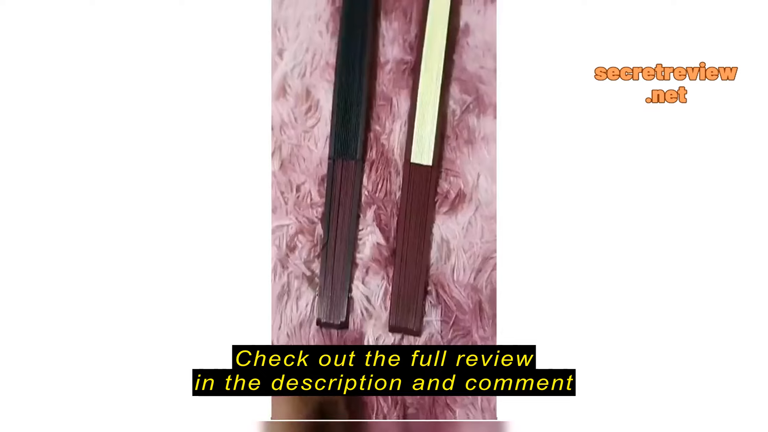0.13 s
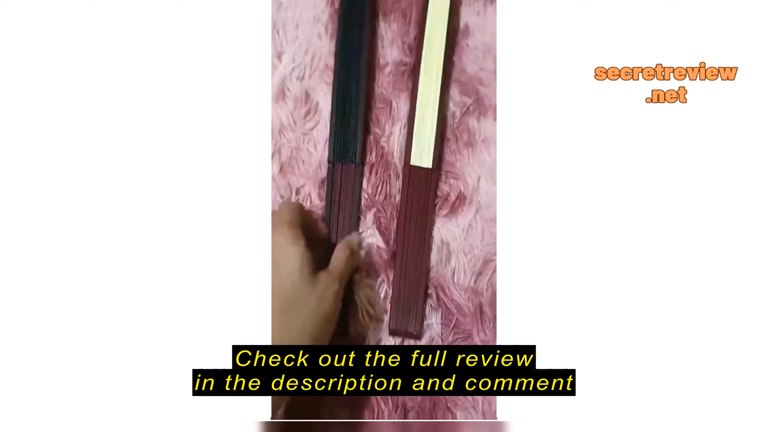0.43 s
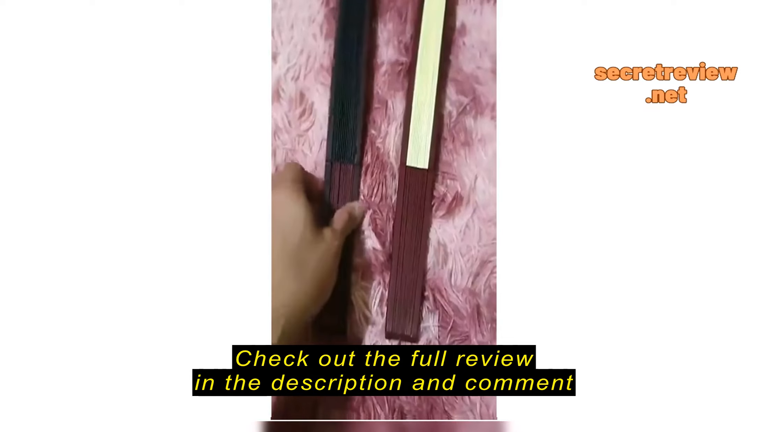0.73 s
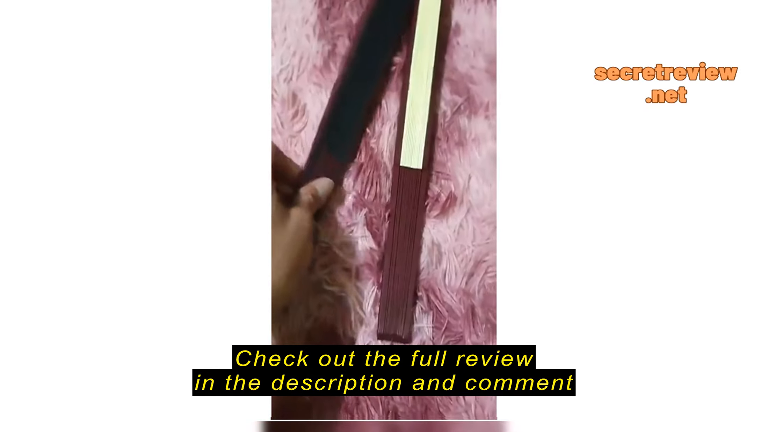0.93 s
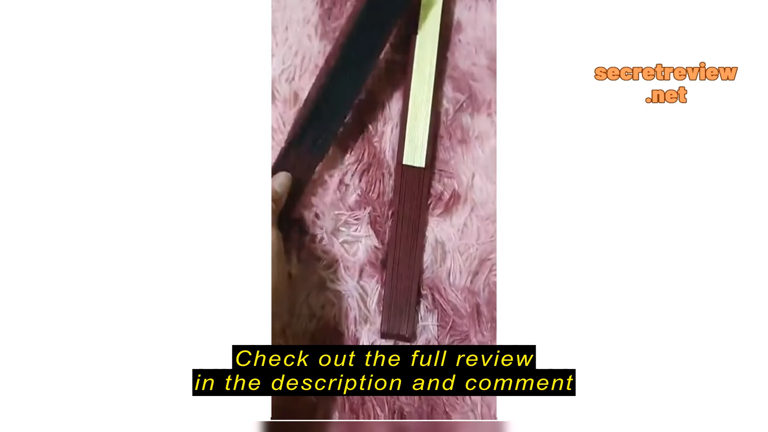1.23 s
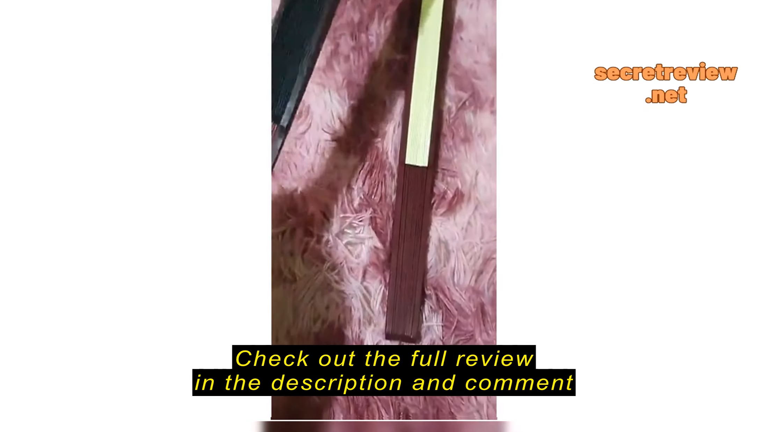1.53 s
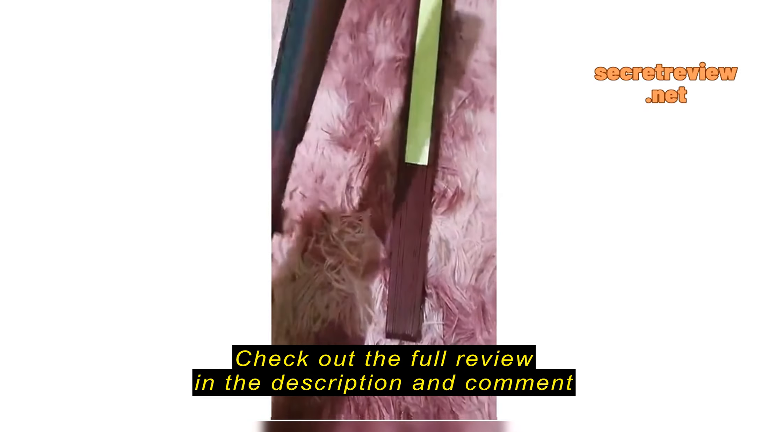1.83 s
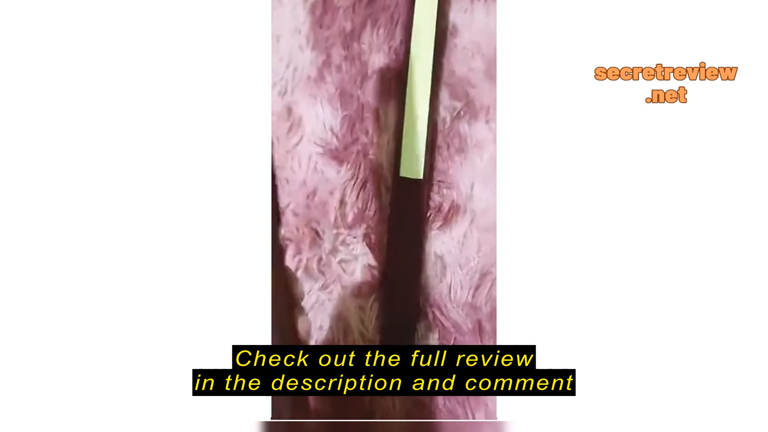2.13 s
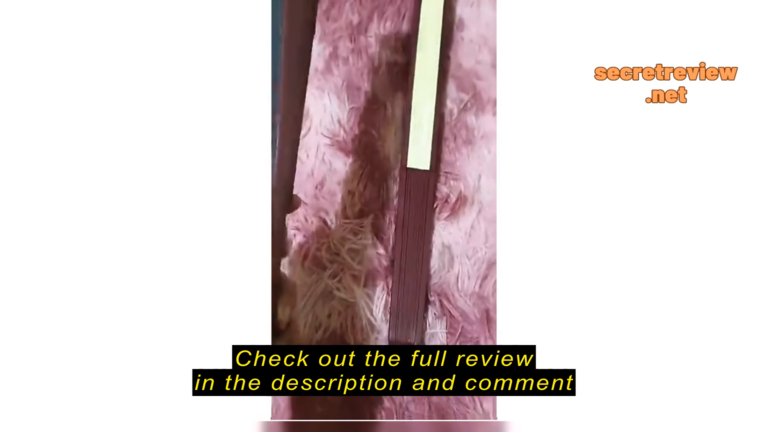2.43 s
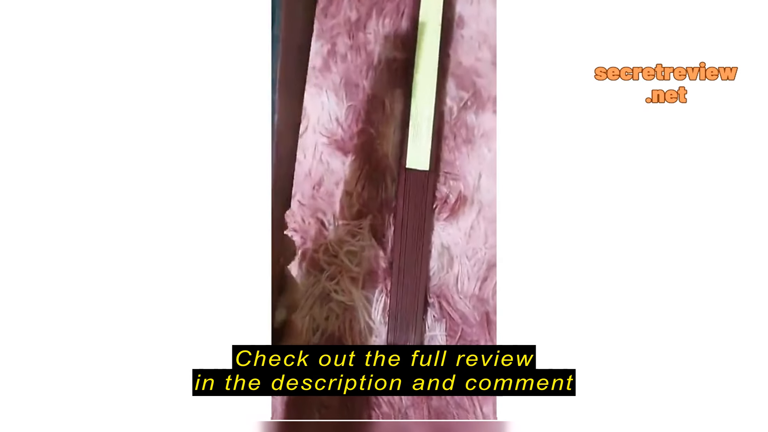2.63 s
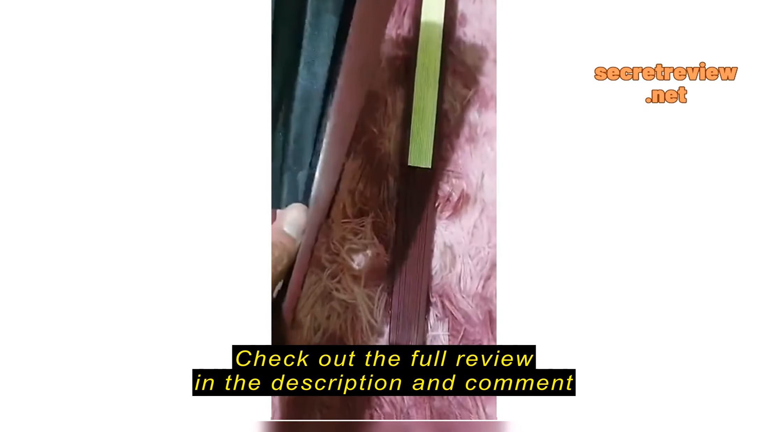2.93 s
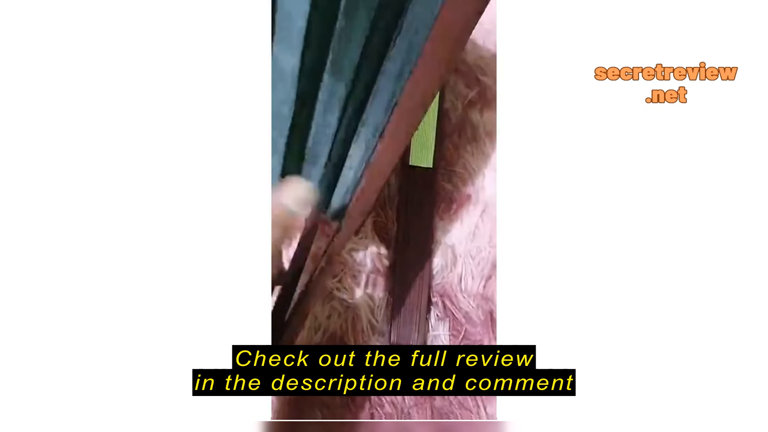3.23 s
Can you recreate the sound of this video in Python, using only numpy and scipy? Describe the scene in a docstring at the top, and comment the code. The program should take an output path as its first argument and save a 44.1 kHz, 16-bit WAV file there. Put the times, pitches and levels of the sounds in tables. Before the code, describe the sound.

A folding fan's ribs snap and its pleated cloth rustles, close up, over humming room air

```python
"""A motor, probably an electric room fan, hums and blows steadily over a low rumble and drone in a small room.
Close by, a hand lifts a closed folding fan from a furry rug: a faint squeak, then two rib clacks and a lighter tick.
The pleated cloth rustles as it slides apart, ribs rub and squeak faintly, and a last light tick comes near the end.
Hum is wavering sines, air and rumble are shaped noise, friction is sparse random slips in stroke envelopes,
and clacks are filtered pulses with decaying modes and noise."""
import sys
import numpy as np
from scipy import signal
from scipy.fft import rfft, irfft
from scipy.io import wavfile
from scipy.ndimage import uniform_filter1d

SR = 44100
rng = np.random.default_rng(int(sys.argv[2]) if len(sys.argv) > 2 else 0)


def to_wav(sig):
    """Store sig (one row per channel, or 1-D mono) as 16-bit WAV at the path in sys.argv[1].

    Samples outside -1..1 are clipped; the rate is SR.
    """
    pcm = np.clip(np.atleast_2d(sig), -1, 1) * 32767
    pcm = np.round(pcm).astype(np.int16)
    wavfile.write(sys.argv[1], SR, pcm.T)  # frames by channels


N = 149499
START_S = 0.161
AIR_PAN_DB, RUMBLE_SIDE_DB = 0.5, -21.5  # left minus right, side minus mid


def amp(db):
    """Decibels to gain."""
    return 10 ** (np.asarray(db) / 20)


def unit(x):
    """Scales to rms 1 over all channels."""
    return x / np.sqrt(np.mean(x ** 2) + 1e-20)


def read(points, hz):
    """Interpolates a table on a log-frequency axis."""
    f, value = np.transpose(points)
    return np.interp(np.log(hz + 1), np.log(f + 1), value)


def over_time(points):
    """Interpolates a table of (seconds, value) at every sample."""
    return np.interp(np.arange(N) / SR, *np.transpose(points))


def colour(x, points):
    """Filters by a table of (Hz, dB)."""
    gain = amp(read(points, np.fft.rfftfreq(N, 1 / SR)))
    return irfft(rfft(x) * gain, N)


def wander(rate_hz):
    """Random motion of rms 1, mostly slower than rate_hz."""
    f = np.fft.rfftfreq(N, 1 / SR)
    lowpass = (f > 0) / (1 + (f / rate_hz) ** 2)
    return unit(irfft(rfft(rng.standard_normal(N)) * lowpass, N))


def band(hz, half_width_hz):
    """Noise in one resonance, two unrelated channels of joint rms 1."""
    f = np.fft.rfftfreq(N, 1 / SR)
    resonance = 1 / (1 + ((f - hz) / half_width_hz) ** 2)
    return unit(irfft(rfft(rng.standard_normal((2, N))) * resonance, N))


def patchy(x, depth_db):
    """Lets small patches of time and frequency rise and fall at random, alike in both channels."""
    z = signal.stft(x, nperseg=512)[2]
    patches = rng.standard_normal(z.shape[1:])
    patches = uniform_filter1d(patches, size=5, axis=0)  # frequency bins
    patches = uniform_filter1d(patches, size=6, axis=1)  # time frames
    return signal.istft(z * amp(depth_db * unit(patches)))[1][:, :N]


def stereo(mid, side):
    """Mid and side to left and right."""
    return np.array([mid + side, mid - side])


def pan(db):
    """Left and right gains for a level difference, left minus right."""
    return amp(np.array([[db], [-db]]) / 2)


def add(mix, start_s, sound):
    """Mixes a sound in at start_s."""
    part = mix[round(start_s * SR):][:len(sound)]
    part += sound[:len(part)]


def pulse(gain_db):
    """Minimum-phase pulse with this spectrum."""
    log_gain = np.log(amp(np.r_[gain_db, gain_db[-2:0:-1]]))
    return np.fft.ifft(np.exp(np.conj(signal.hilbert(log_gain)))).real


def tone(turns, db, waver, side_db):
    """One sine line, its level wavering by an rms fraction, with a quadrature side signal."""
    phase = 2 * np.pi * (turns + rng.random())
    level = np.sqrt(2) * amp(db) * (1 + waver * wander(rate_hz=2.5))
    return level * stereo(np.sin(phase), amp(side_db) * np.cos(phase))


def air():
    """Moving air as patchy shaped noise that swells slightly at first, narrow in the bass, wide in the treble."""
    # Spectrum. Each row: frequency in Hz, relative density in dB per Hz.
    air_spectrum = [(25, -19), (100, -6), (165, -18), (205, -8.5), (240, -14), (290, -12), (360, -18),
                    (530, -16), (666, -20.5), (860, -19), (1100, -17), (1380, -19.5), (1900, -22),
                    (2150, -24.5), (4750, -31), (6600, -36), (7900, -47), (9500, -42.5), (10700, -46.5),
                    (14000, -47), (15500, -58)]
    # Stereo width. Each row: frequency in Hz, side minus mid in dB.
    air_width = [(60, -22), (120, -12), (240, -19.5), (480, -1.5), (950, -6.5), (1890, -2), (3770, 1.5),
                 (7520, 0.5), (15000, 0.5)]
    level_db, patch_db = -45.5, 1.6
    settle_db, settle_s = -1, 0.14
    noise = patchy(rng.standard_normal((2, N)), patch_db)
    mid, side = unit(colour(noise, air_spectrum))
    settle = np.exp(-np.maximum(np.arange(N) / SR - START_S, 0) / settle_s)
    return amp(level_db + settle_db * settle) * pan(AIR_PAN_DB) * stereo(mid, colour(side, air_width))


def rumble():
    """Low room rumble as nearly mono shaped noise that swells and sinks a little."""
    # Spectrum. Each row: frequency in Hz, relative density in dB per Hz.
    rumble_spectrum = [(20, -50), (32, -28), (48, 6), (62, 1), (80, -1.5), (100, -3), (138, -2), (170, -16),
                       (400, -52)]
    # Level. Each row: time in seconds, level in dB.
    rumble_level = [(.17, -43), (.38, -48), (.6, -43), (.95, -47), (1.1, -40), (1.3, -43), (1.45, -43),
                    (1.85, -42.5), (2.0, -47), (2.6, -44), (2.8, -44), (3.39, -45)]
    mid, side = unit(colour(rng.standard_normal((2, N)), rumble_spectrum))
    return amp(over_time(rumble_level)) * pan(AIR_PAN_DB) * stereo(mid, amp(RUMBLE_SIDE_DB) * side)


def drone():
    """A low sine of unsteady pitch whose level rises and sinks."""
    # Level. Each row: time in seconds, level in dB.
    drone_level = [(.17, -60), (.33, -60), (.45, -44.5), (1.2, -50.5), (1.65, -47.5), (2.3, -47.5),
                   (2.5, -51), (2.9, -57), (3.3, -50.5)]
    drone_hz, wander_hz = 98, 2.9
    turns = np.cumsum(drone_hz + wander_hz * wander(rate_hz=3.9)) / SR
    return tone(turns, over_time(drone_level), 0, RUMBLE_SIDE_DB) * pan(AIR_PAN_DB)


def motor():
    """Motor harmonics, a thin whine of fixed pitch, a passing noise swell and narrow housing resonances."""
    # Hum. Each row: multiple of the motor rate, level in dB.
    hum = [(1, -55), (2, -51), (3, -54.5), (4, -60), (6, -63), (7, -63.5), (8, -72.5), (11, -65.5)]
    # Fifth harmonic, which comes and goes. Each row: time in seconds, level in dB.
    fifth_level = [(.17, -63), (.35, -54.5), (.65, -50), (.95, -62), (1.4, -66), (1.9, -59), (2.15, -51.5),
                   (2.4, -52.5), (2.7, -50), (2.85, -61), (3.39, -55)]
    # Low-mid swell: peak in seconds, half length in seconds, frequency in Hz, half width in Hz, level in dB.
    hum_swell = (2.5, .32, 216, 37, -50)
    # Housing resonances. Each row: frequency in Hz, half width in Hz, level in dB, side minus mid in dB.
    housing = [(791.5, 9.4, -64, -4), (913, 32, -59.5, -23), (1003.5, 50, -54, -25)]
    motor_hz, drift_turns_rms = 64.6, 0.033
    hum_waver, hum_side_db = 0.18, -20
    whine_hz, whine_db, whine_waver, whine_side_db = 480.4, -55.5, 0.22, -23
    surge_db_rms = 1.5

    t = np.arange(N) / SR
    turns = motor_hz * t + drift_turns_rms * wander(rate_hz=1.0)
    out = sum(tone(round(multiple) * turns, db, hum_waver, hum_side_db) for multiple, db in hum)
    out += tone(5 * turns, over_time(fifth_level), 0, hum_side_db)
    out += tone(whine_hz * t, whine_db, whine_waver, whine_side_db)

    peak_s, half_s, swell_hz, swell_half_width_hz, swell_db = hum_swell
    swell = np.exp(-((t - peak_s) / half_s) ** 2)
    out += amp(swell_db) * swell * band(swell_hz, swell_half_width_hz)[0]

    for hz, half_width_hz, db, side_db in housing:
        mid, side = band(hz, half_width_hz)
        out += amp(db + surge_db_rms * wander(rate_hz=5.8)) * stereo(mid, amp(side_db) * side)
    return out * pan(AIR_PAN_DB)


def squeaks():
    """Faint stick-slip of the ribs at the pivot: short sines with fast pitch jitter."""
    # Each row: peak in seconds, half length in seconds, peak amplitude in dB.
    squeak_events = [(0.47, .006, -53), (2.576, .01, -59), (3.082, .014, -60)]
    squeak_hz, jitter_rms = 4250, 0.033  # jitter as a fraction of pitch
    t = np.arange(N) / SR
    swell = sum(amp(db) * np.exp(-((t - peak_s) / half_s) ** 2) for peak_s, half_s, db in squeak_events)
    turns = np.cumsum(squeak_hz * (1 + jitter_rms * wander(rate_hz=520))) / SR
    return swell * np.sin(2 * np.pi * (turns + rng.random((2, 1))))


def friction(strokes, spectrum, pan_db, grains_per_s, patch_db):
    """Tiny random slips, coloured by the material, that swell and fade with each stroke."""
    t = np.arange(N) / SR
    power = np.zeros(N)
    for peak_s, rise_s, fall_s, db in strokes:
        length_s = np.where(t < peak_s, rise_s, fall_s)
        power += amp(db) ** 2 * np.exp(-((t - peak_s) / length_s) ** 2)
    slips = (rng.random((2, N)) < grains_per_s / SR) * rng.standard_normal((2, N))
    return np.sqrt(power) * unit(colour(patchy(slips, patch_db), spectrum)) * pan(pan_db)


def cloth():
    """Pleated cloth sliding apart: fine rustling strokes over a faint drag that slowly grows towards the end."""
    # Rustles of cloth and ribs. Each row: peak in seconds, rise in seconds, fall in seconds, level in dB.
    rustles = [(1.05, .02, .03, -55), (1.135, 0.044, 0.036, -55), (1.21, 0.027, 0.021, -52.5),
               (1.263, 0.011, 0.024, -56), (1.34, 0.022, 0.036, -54), (1.505, 0.054, 0.035, -57.5),
               (1.70, .015, .04, -63), (2.275, 0.051, 0.022, -59), (2.348, 0.012, 0.019, -53.5),
               (2.44, 0.028, 0.025, -57), (2.53, 0.045, 0.019, -52.5), (2.621, 0.011, 0.018, -48.5),
               (2.70, 0.015, 0.012, -49.5), (2.805, 0.049, 0.028, -52), (2.915, 0.04, 0.021, -53.5),
               (3.004, 0.008, 0.015, -48), (3.255, 0.075, 0.13, -56.5), (3.385, 0.012, .02, -51)]
    # Slowly growing drag under the rustles: peak in seconds, rise in seconds, fall in seconds, level in dB.
    drag = (3.5, 1.8, .6, -63)
    # Spectrum. Each row: frequency in Hz, relative density in dB per Hz.
    cloth_spectrum = [(1000, -4), (3000, 6), (6000, 9.5), (8000, 0.5), (10500, 4), (12500, 8), (14000, 8.5),
                      (15300, 6.5)]
    return friction([*rustles, drag], cloth_spectrum, pan_db=1, grains_per_s=7000, patch_db=2.5)


def clacks():
    """A rib slips and hits its neighbour: a crack, short ringing modes and a bright chatter through the stack."""
    # Each row: contact in seconds, gain in dB, contact softening corner in Hz, slip level in dB.
    clack_events = [(1.1125, 0, 15000, -36), (1.2073, -10, 5000, -65), (1.2605, -18.5, 6000, -60),
                    (3.381, -27, 5500, -58)]
    # Contact pulse spectrum. Each row: frequency in Hz, gain in dB.
    contact_spectrum = [(100, -32), (830, -18.5), (1080, 11), (1500, 5), (2300, 3.5), (3100, 11),
                        (4200, -6), (5400, -8), (9000, -28), (15000, -25)]
    # Rib stack chatter spectrum. Each row: frequency in Hz, gain in dB.
    chatter_spectrum = [(300, -16), (800, -14), (1200, 3), (2600, -7), (3400, 1), (3950, 8.5), (4500, 2),
                        (5200, -11), (7000, -14), (10000, -18), (13500, -15)]
    # Rib modes. Each row: frequency in Hz, level in dB, t60 in seconds.
    rib_modes = [(1123, -23, 0.019), (2230, -38.5, 0.1), (3900, -33, .006), (12400, -25, 0.0058)]
    slip_s, slip_hz, slip_half_width_hz = 0.0037, 6700, 1800
    chatter_t60_s, chatter_delay_s = 0.013, 0.0009
    right_lag_s = 0.00011

    size = 4096
    t, f = np.arange(size) / SR, np.fft.rfftfreq(size, 1 / SR)
    contact, rattle = pulse(read(contact_spectrum, f)), pulse(read(chatter_spectrum, f))
    ring = sum(amp(db - 60 * t / t60_s) * np.cos(2 * np.pi * hz * t) for hz, db, t60_s in rib_modes)
    # half-sine swell, from slip_s before contact to slip_s after
    slip_swell = np.sin(np.pi * np.minimum(t / (2 * slip_s), 1))
    slip = band(slip_hz, slip_half_width_hz)[:, :size] * slip_swell

    out = np.zeros((2, N))
    for contact_s, db, corner_hz, slip_db in clack_events:
        hardness = pulse(-10 * np.log10(1 + (f / corner_hz) ** 4))
        for channel, lag_s in enumerate([0, right_lag_s]):
            hits = rng.standard_normal(size) * amp(-60 * t / chatter_t60_s) * (t > chatter_delay_s)
            chatter = signal.fftconvolve(rattle, hits / np.linalg.norm(hits))[:size]
            clack = signal.fftconvolve(contact + ring + chatter, hardness)
            add(out[channel], contact_s + lag_s, amp(db) * clack)
            add(out[channel], contact_s - slip_s, amp(slip_db) * slip[channel])
    return out


def wood():
    """Ribs rubbing on each other: scraping in coarser grains than the cloth."""
    # Rubs. Each row: peak in seconds, rise in seconds, fall in seconds, level in dB.
    rubs = [(1.135, 0.022, 0.013, -45.5), (1.266, 0.021, 0.032, -48), (2.6, 0.067, .25, -57),
            (3.004, 0.0064, 0.011, -51), (3.33, 0.23, 0.033, -54.5), (3.385, 0.0071, 0.03, -46)]
    # Spectrum. Each row: frequency in Hz, relative density in dB per Hz.
    wood_spectrum = [(500, -26), (1500, -15), (2300, 8.5), (3300, 3), (4400, 2), (6500, -4.5), (9000, -11),
                     (15000, -18)]
    return friction(rubs, wood_spectrum, pan_db=3, grains_per_s=1500, patch_db=3.5)


def room(x):
    """A short diffuse tail of decaying noise, different in each channel."""
    # Decay. Each row: frequency in Hz, t60 in seconds.
    room_decay = [(200, 0.45), (2000, 0.35), (12000, 0.049)]
    size, gap_s = SR // 2, 0.005
    noise = rng.standard_normal((2, size)) * (np.arange(size) > gap_s * SR)
    hz, t, z = signal.stft(noise, SR)
    decay = amp(-60 * t / read(room_decay, hz)[:, None])
    tail = signal.istft(z * decay, SR)[1]
    return signal.fftconvolve(x, tail / np.linalg.norm(tail[0]), axes=1)[:, :N]


def scene():
    """The handled fan in its room, over the motor, its air, the rumble and the drone."""
    room_db = -19
    background = air() + rumble() + drone() + motor()
    fan = squeaks() + cloth() + clacks() + wood()
    return background + fan + amp(room_db) * room(fan)


def record(dry):
    """Silence until the sound cuts in at START_S, then a steep lowpass."""
    edge_hz = 15550
    live = dry * (np.arange(N) >= START_S * SR)
    lowpass = signal.firwin(511, edge_hz, window=("kaiser", 9), fs=SR)
    return signal.oaconvolve(live, lowpass[None], "same")


dry = scene()
out = record(dry)
to_wav(out)
```